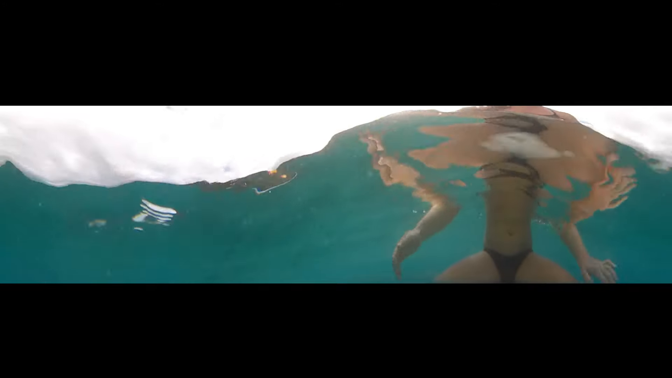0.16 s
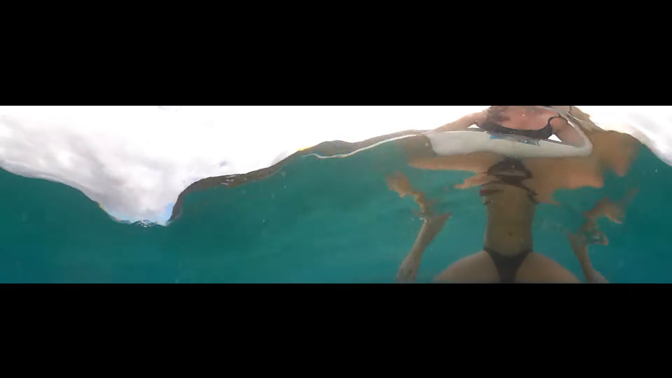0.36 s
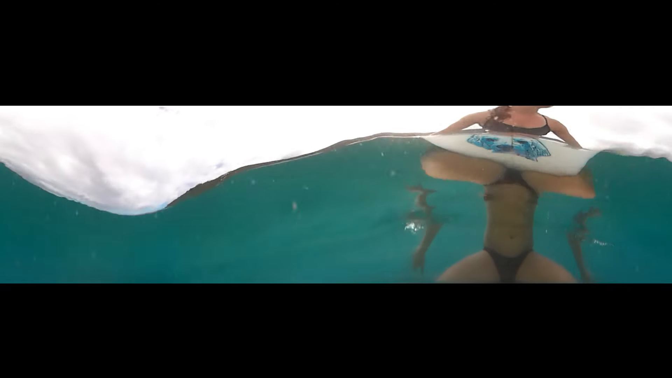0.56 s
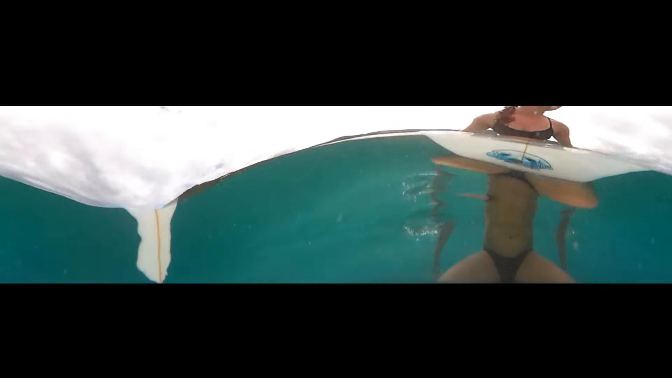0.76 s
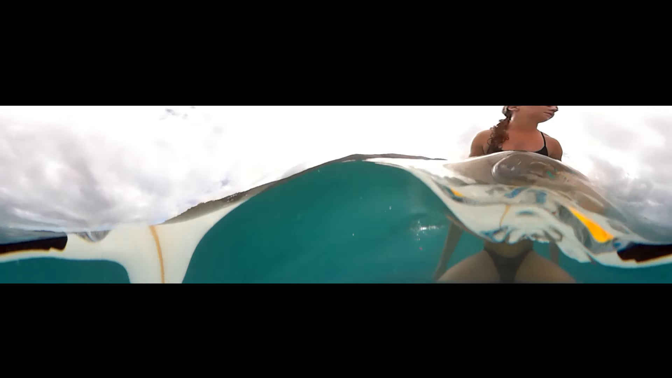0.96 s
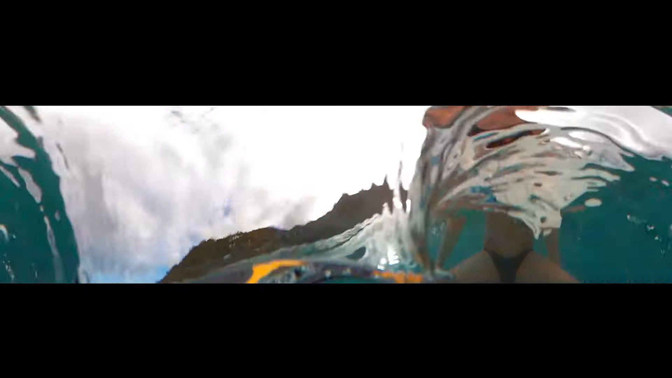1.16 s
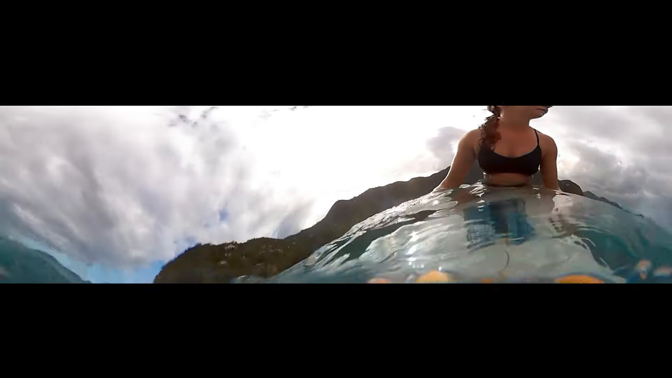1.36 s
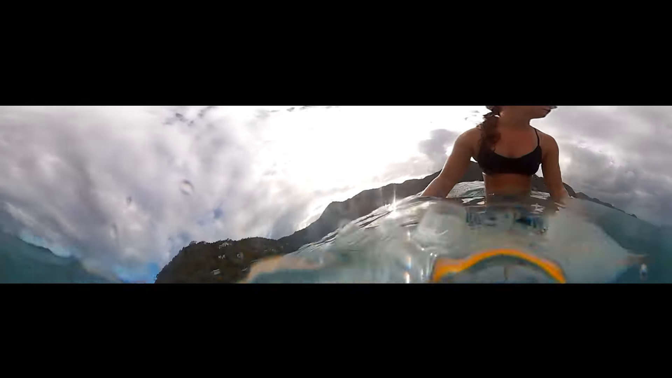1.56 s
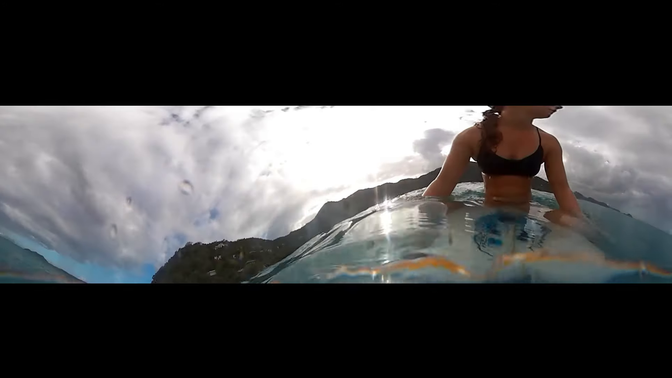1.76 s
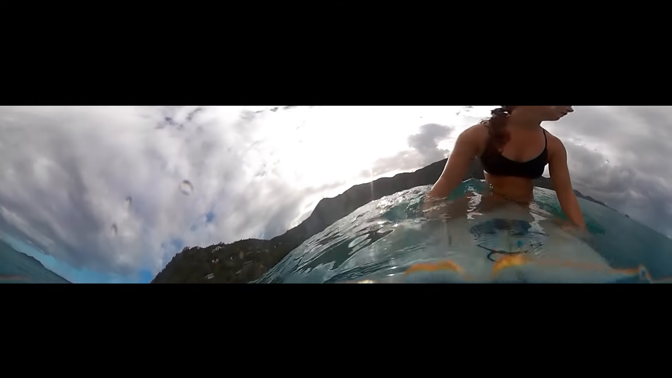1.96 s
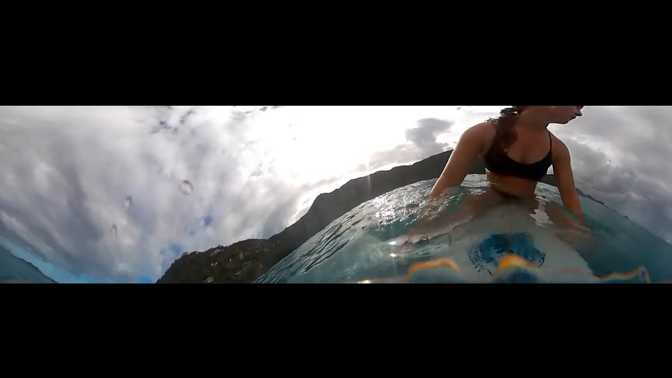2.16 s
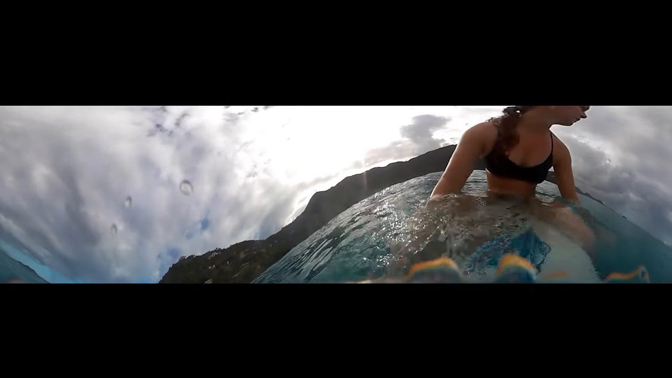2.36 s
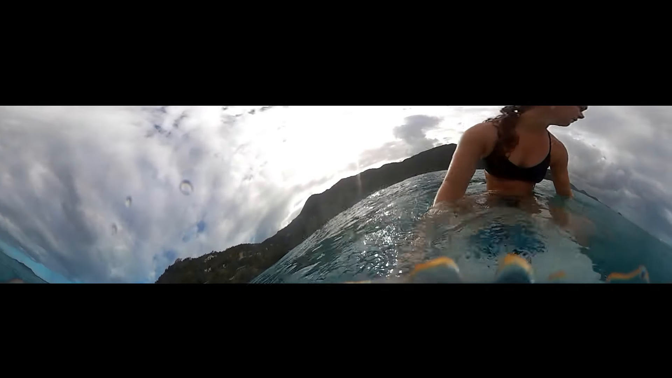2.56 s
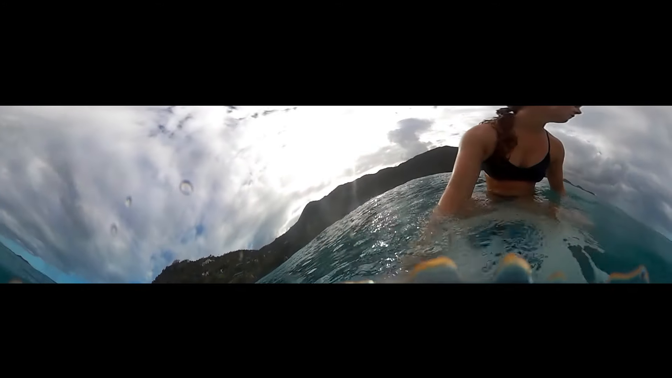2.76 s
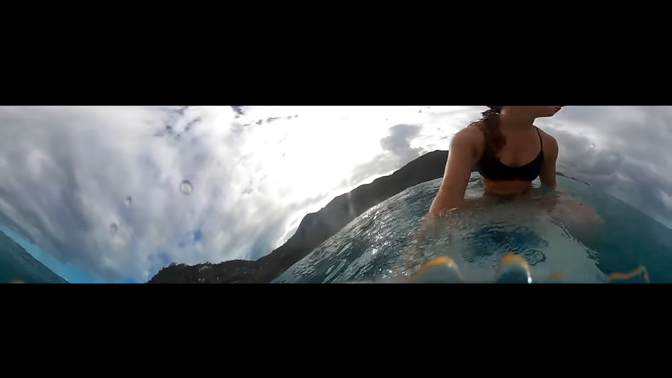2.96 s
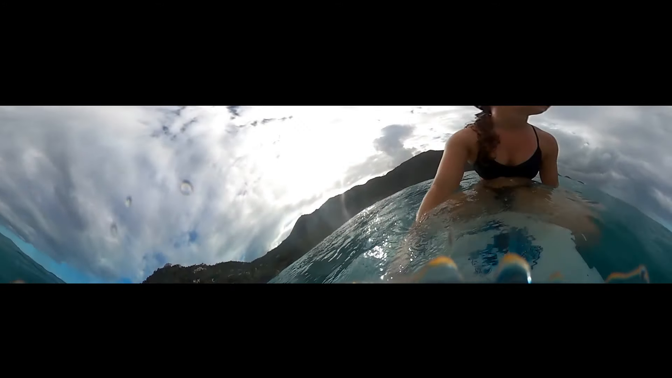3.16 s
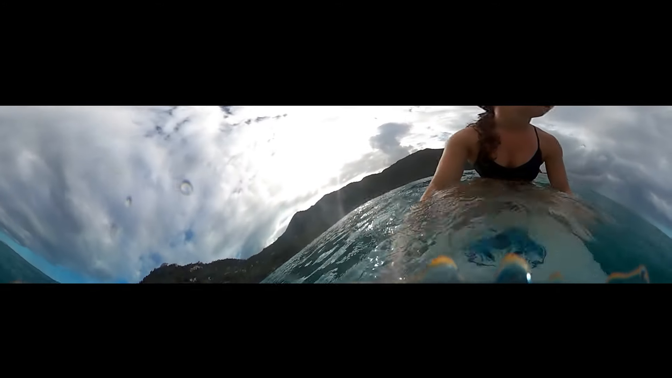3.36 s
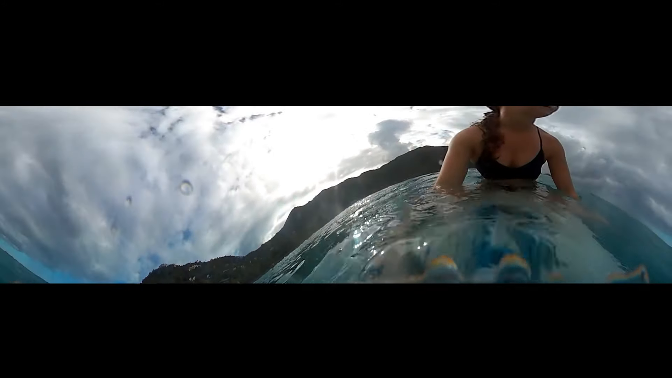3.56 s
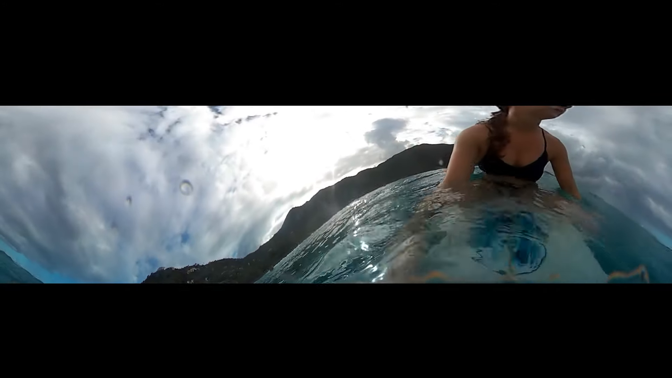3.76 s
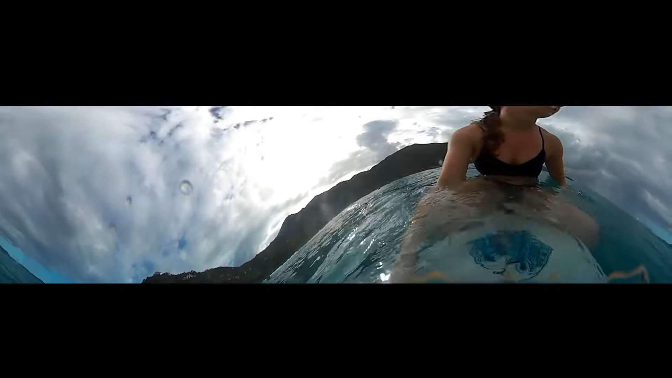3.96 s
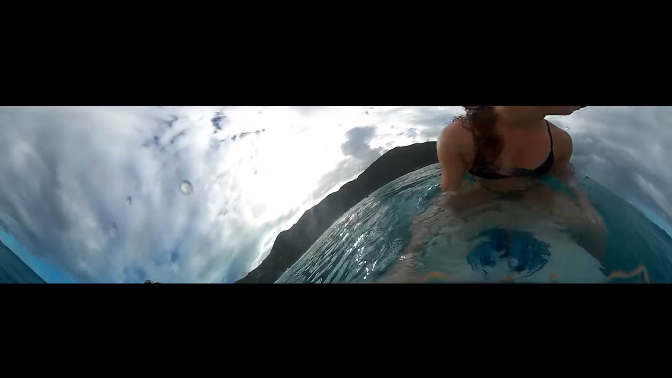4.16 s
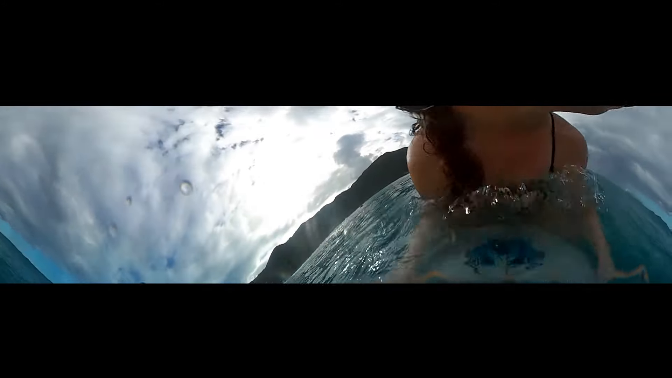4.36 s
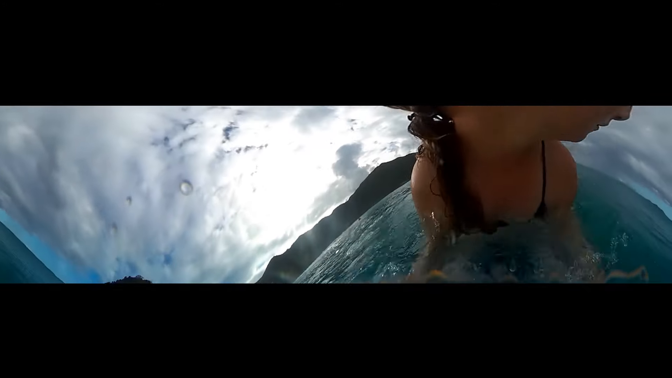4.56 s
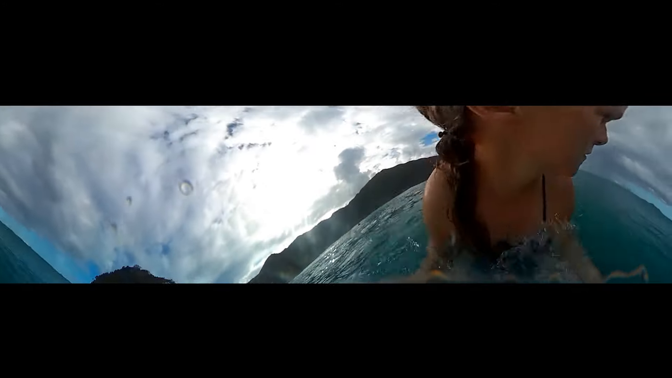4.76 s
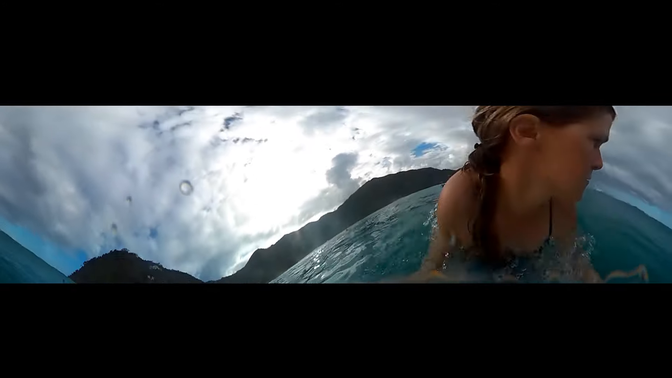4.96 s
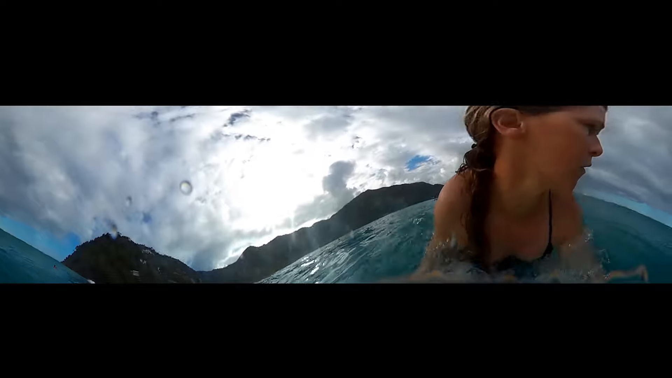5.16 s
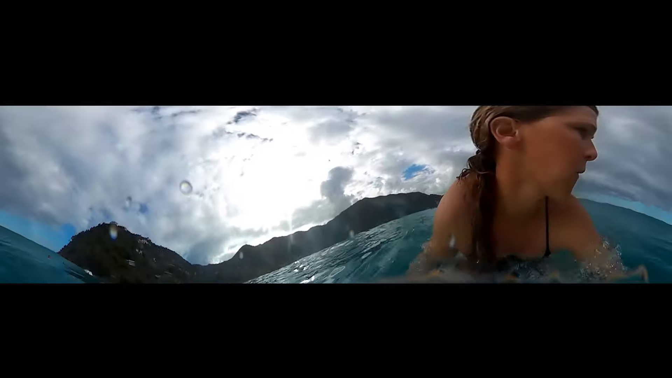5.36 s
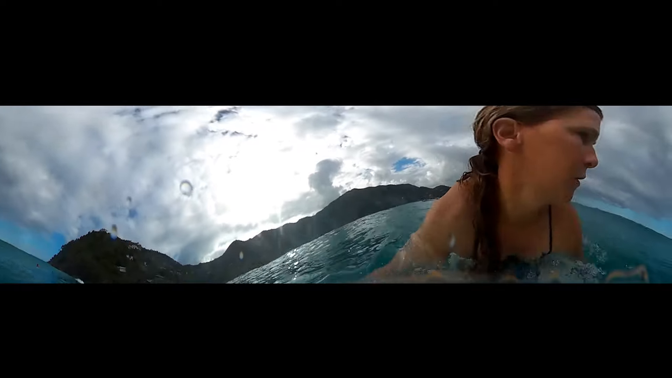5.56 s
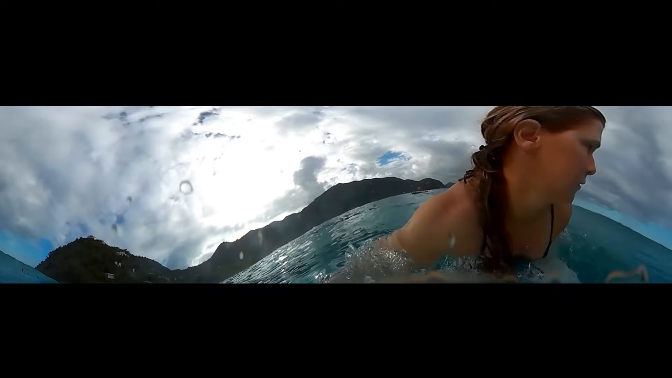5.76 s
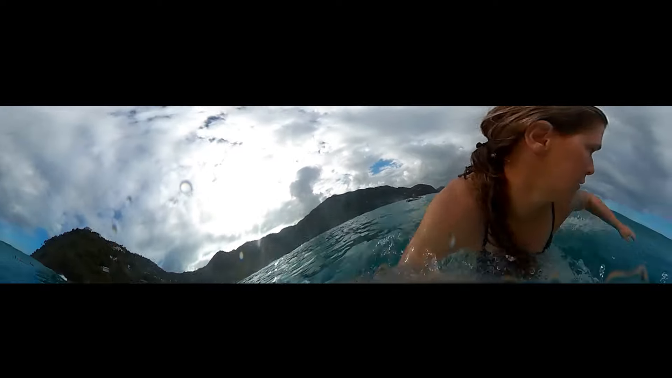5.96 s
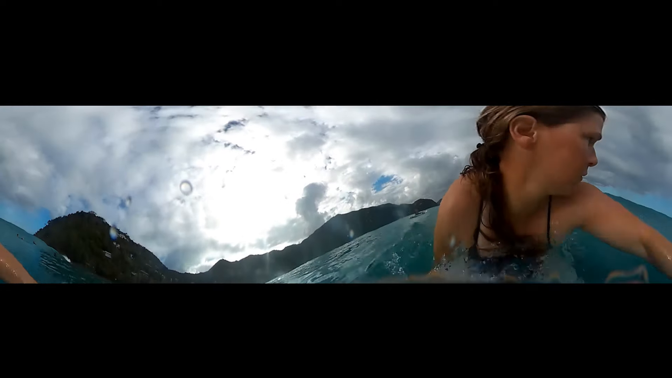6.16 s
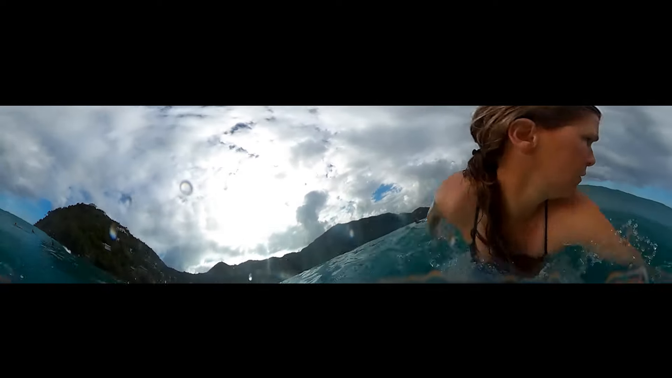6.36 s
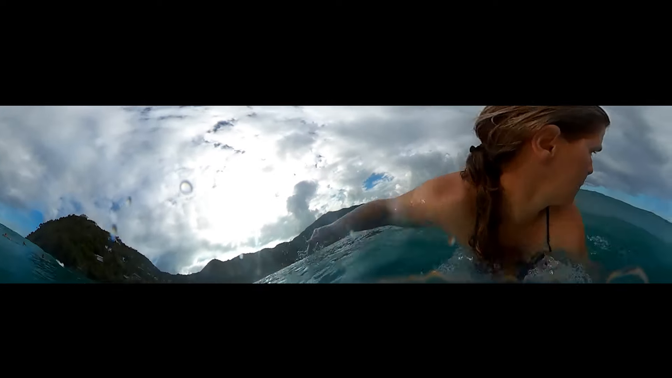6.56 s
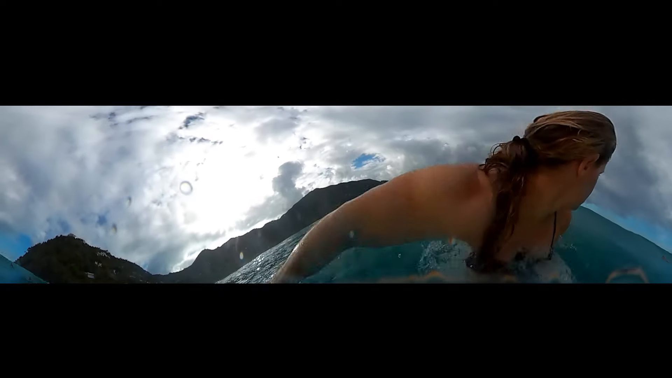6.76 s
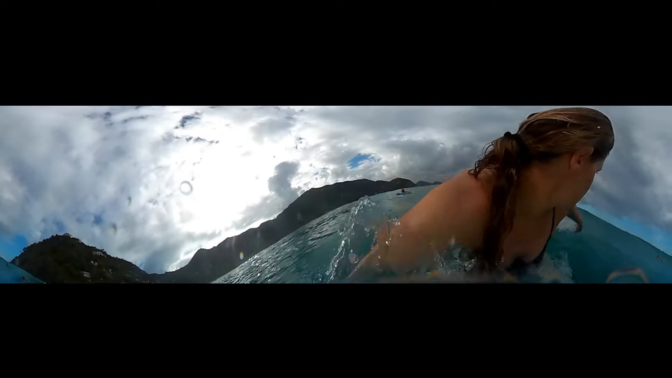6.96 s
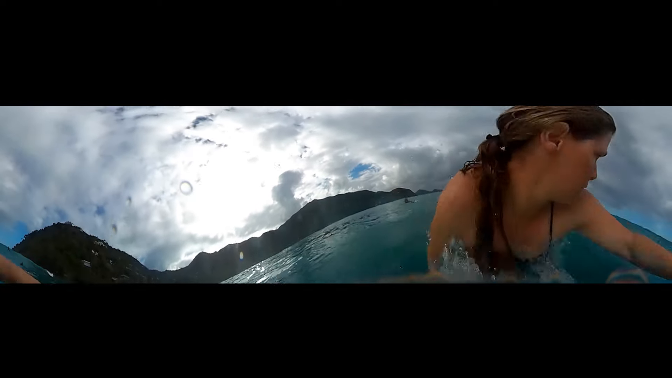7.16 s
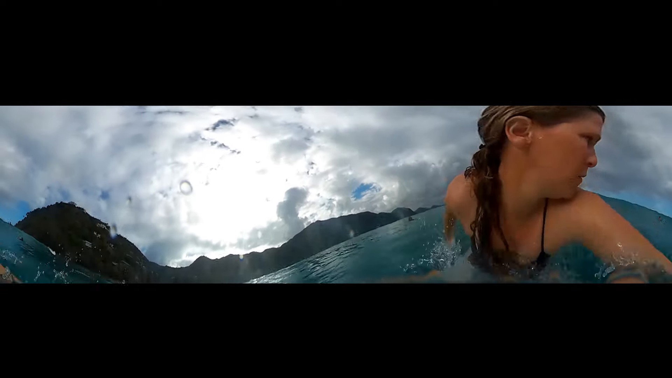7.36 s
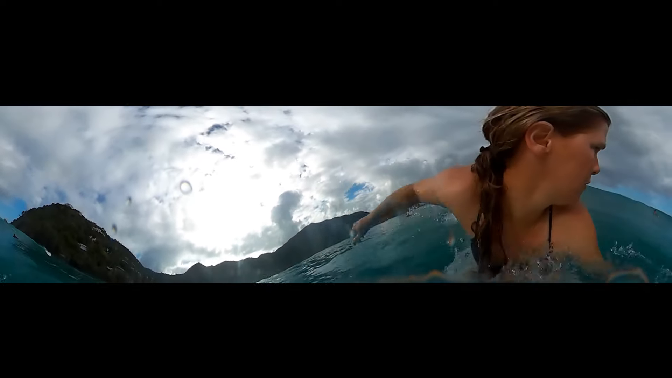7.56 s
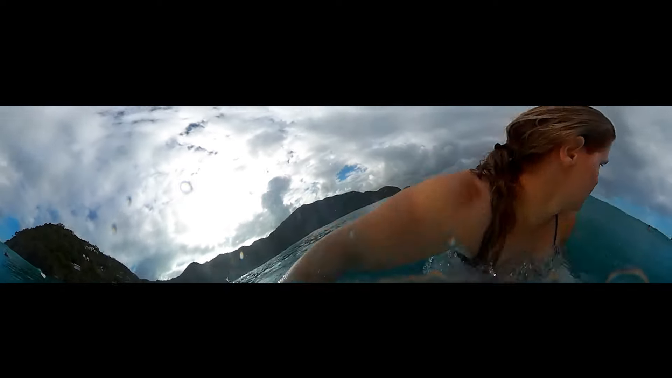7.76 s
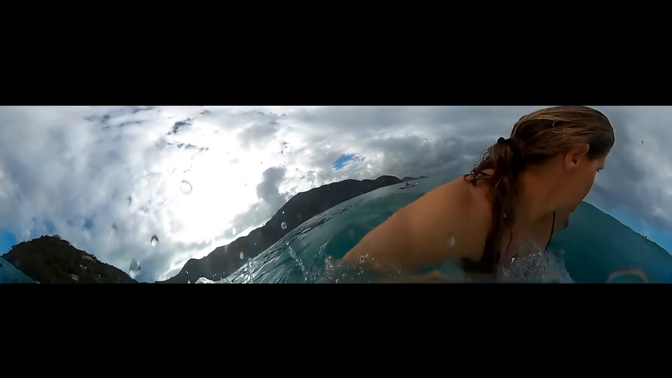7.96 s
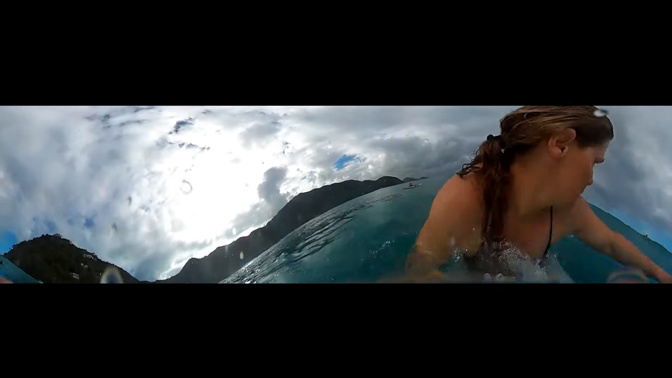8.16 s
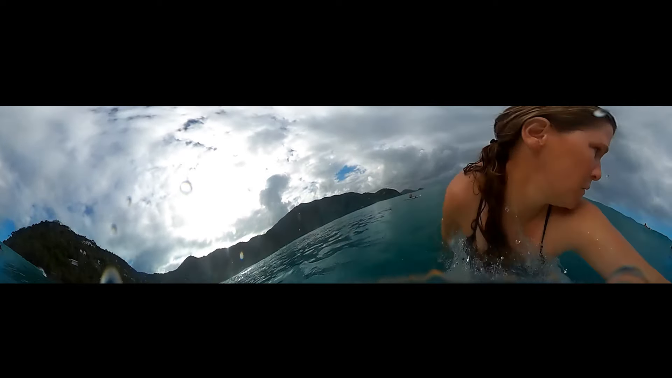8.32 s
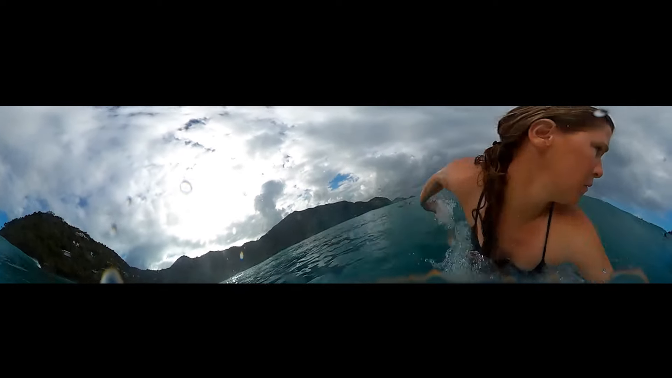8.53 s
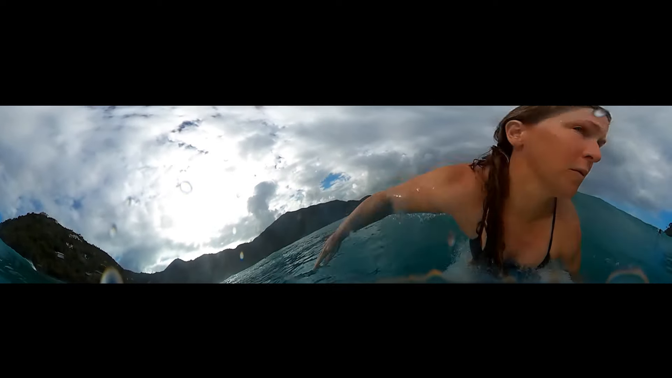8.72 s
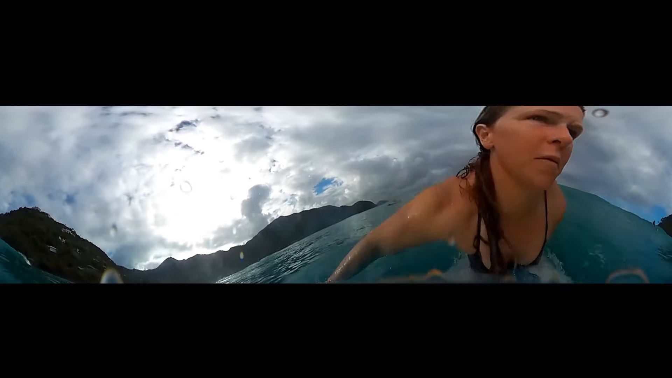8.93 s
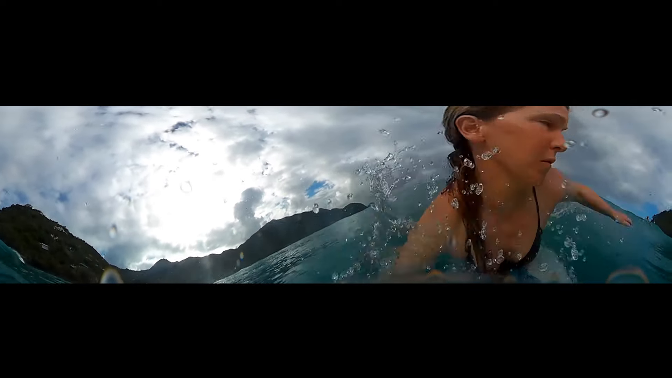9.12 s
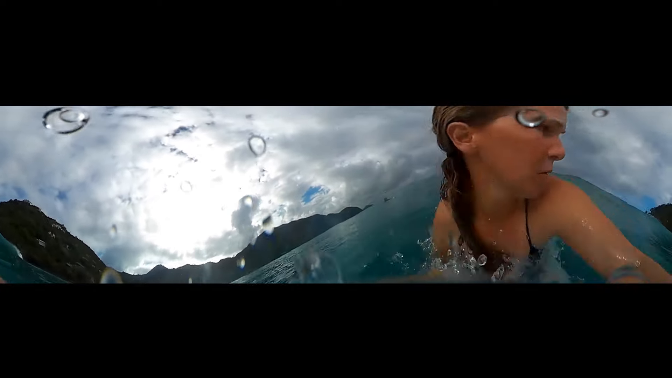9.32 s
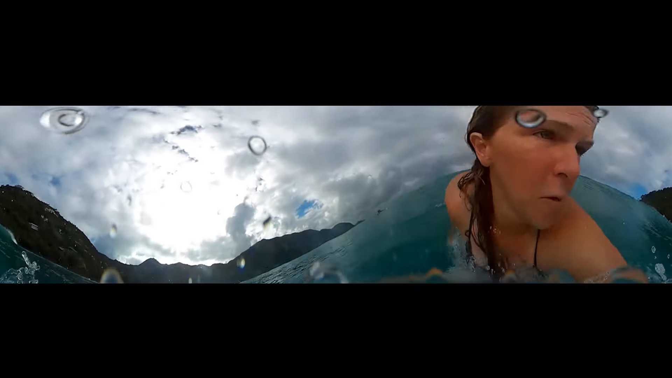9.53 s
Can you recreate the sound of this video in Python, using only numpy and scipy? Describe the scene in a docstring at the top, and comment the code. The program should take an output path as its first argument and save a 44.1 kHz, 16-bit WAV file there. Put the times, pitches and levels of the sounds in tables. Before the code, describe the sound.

Sea water heard through a waterproof housing: faint hiss and plops, one violent slap, bubbly draining, then thick rushing, knocking paddle splashes.

```python
"""A camera in a waterproof housing on the nose of a surfboard, over the steady noise of its microphones.
Calm water laps, a wave slaps the board and drains, then paddling arms churn the sea.
The water is damped sine bubbles over filtered noise in four bands; drops splat on the housing as noise
bursts and air pockets ring as rising sines. The loud peaks overload; near the end the sound drops out briefly.
"""
import sys
import numpy as np
from scipy import signal
from scipy.fft import rfft, irfft, next_fast_len
from scipy.io import wavfile
from scipy.ndimage import uniform_filter1d, map_coordinates

SR = 44100
rng = np.random.default_rng(int(sys.argv[2]) if len(sys.argv) > 2 else 0)


def wrap_up_sound(samples):
    """Save the sound to the file named by the first command line argument, as 16-bit audio."""
    columns = np.atleast_2d(samples).T
    # keep every value between -1 and 1, then stretch to whole-number steps
    tamed = np.clip(columns, -1, 1)
    steps = np.round(tamed * 32767).astype(np.int16)
    wavfile.write(sys.argv[1], SR, steps)


N = 427329


def amp(db):
    """Amplitude factor of a level in dB."""
    return 10 ** (np.asarray(db) / 20)


def unit(x):
    """x scaled to an RMS of 1."""
    return x / np.sqrt(np.mean(x ** 2) + 1e-20)


def along(points, hz):
    """(Hz, value) points interpolated on a log frequency axis."""
    f, v = np.transpose(points)
    return np.interp(np.log(hz + 1), np.log(f + 1), v)


def curves(rows):
    """One value per sample for each column after the time."""
    s, *columns = np.transpose(rows)
    return [np.interp(np.arange(N) / SR, s, column) for column in columns]


def wobble(knots_per_s):
    """A smooth random curve through normally distributed knots."""
    knots = rng.standard_normal(int(N * knots_per_s / SR) + 4)
    return map_coordinates(knots, [np.arange(N) * knots_per_s / SR])


def coloured(x, spectrum):
    """x through a causal minimum-phase filter, made by folding the cepstrum of the spectrum."""
    m = 2 * next_fast_len(x.shape[-1] // 2 + 4096)
    hz = np.fft.rfftfreq(m, 1 / SR)
    fold = irfft(np.log(amp(along(spectrum, hz))), m)
    fold[1:m // 2] *= 2
    fold[m // 2 + 1:] = 0
    return irfft(rfft(x, m) * np.exp(rfft(fold)), m)[..., :x.shape[-1]]


# microphone noise spectrum: (frequency [Hz], relative density [dB])
HISS_SPECTRUM = [(60, -23.5), (150, 2), (400, -6), (1500, -21.5), (4400, -27.5), (5250, -41.5), (6200, -32),
                 (9000, -29.5), (11600, -30.5), (12800, -88), (16000, -120)]


def hiss():
    """The steady noise of the microphones: filtered noise, unrelated left and right."""
    return amp(-58.5) * unit(coloured(rng.standard_normal((2, N)), HISS_SPECTRUM))


# likeness of the ports: (frequency [Hz], left-right correlation [-1 to 1])
PORT_LIKENESS = [(60, 1), (120, 1), (240, 0.83), (490, 0.3), (990, 1), (2000, 0.3), (4040, 0.34),
                 (5600, 0.48), (6400, -.6), (8140, -0.32)]
# balance of the ports: (frequency [Hz], left over right [dB])
PORT_BALANCE = [(60, 5), (100, 10.5), (180, 7.5), (310, 0.5), (530, 4), (920, -1.5), (1580, 1), (2730, 9),
                (4720, 7), (8140, 2.5)]


def ports(pair):
    """Two unrelated sounds mixed as the left and right port hear them, by frequency."""
    hz = np.fft.rfftfreq(N, 1 / SR)
    turn = np.arccos(np.clip(along(PORT_LIKENESS, hz), -1, 1)) / 2
    common, opposed = rfft(pair) * [np.cos(turn), np.sin(turn)]
    balance = amp(np.outer([.5, -.5], along(PORT_BALANCE, hz)))
    return irfft(np.array([common + opposed, common - opposed]) * balance, N)


# narrow housing modes that ring under the water's load: (centre [Hz], width [Hz], level [dB])
SHELL_MODES = [(270.3, 19, -3), (724, 38, -6.5), (1040, 100, -9), (2015, 220, 3), (3254, 150, 2),
               (7300, 300, -1.5), (8850, 400, 3.5)]


def shell(x):
    """x plus the resonant ringing that it starts in the housing's modes."""
    f = np.fft.rfftfreq(N, 1 / SR)
    response = 1
    for centre, width, db in SHELL_MODES:
        response = response + amp(db) * 1j * f * width / (centre ** 2 - f * f + 1j * f * width)
    return irfft(rfft(x) * response, N)


def bubbles(count, pitch_hz, octaves, cycles, spread_db, size):
    """Random bubbles: quickly damped rising sines with a soft start, a few far louder than the rest."""
    when, tone, loud, life = rng.random((4, count))
    hz = pitch_hz * 2 ** (octaves * (2 * tone - 1))[:, None]
    turns = np.arange(size) / SR * hz
    tone_wave = np.sin(2 * np.pi * turns * (1 + 0.053 * turns / cycles))
    decay = amp(-30 * turns / (cycles * (0.83 + life[:, None])))
    ring = tone_wave * decay * (1 - np.exp(-turns)) ** 2
    ring *= amp(-spread_db * np.log(1 - .98 * loud))[:, None]
    at = (when * N).astype(int)[:, None] + np.arange(size)
    return unit(np.bincount(at.ravel(), ring.ravel(), N + size)[:N])


def froth(spectrum, share, lumps_db, **grain):
    """Bubbles (share of the power) over noise, in lumps, through the ports and housing."""
    pair = []
    for _ in range(2):
        ringing = np.sqrt(share) * bubbles(**grain)
        pair.append(ringing + np.sqrt(1 - share) * rng.standard_normal(N))
    heard = ports(coloured(np.array(pair), spectrum))
    return unit(shell(heard * amp(lumps_db)))


# low band the housing lets through: (frequency [Hz], relative density [dB])
CHURN_SPECTRUM = [(60, -47.5), (100, -19), (170, -5), (253, -11), (350, -12), (716, 0.5), (885, -2),
                  (1070, -0.5), (1500, -4.5), (1900, -23), (2400, -27.5), (4000, -120)]


def churn(slosh, patter_db):
    """Large, low-pitched bubbles over noise."""
    lumps_db = .3 * patter_db + 1.5 * slosh + 1.6 * wobble(7)
    return froth(CHURN_SPECTRUM, share=.6, lumps_db=lumps_db, count=8000, pitch_hz=617.7,
                 octaves=1.6, cycles=14, spread_db=2.3, size=1100)


# middle band the housing lets through: (frequency [Hz], relative density [dB])
SPRAY_SPECTRUM = [(700, -120), (1500, -6), (1970, -4), (2250, -9), (2510, -3), (2800, -9), (3300, -4),
                  (4400, -11.5), (5000, -31), (7000, -120)]


def spray(slosh, patter_db):
    """Smaller, higher bubbles over noise, following the droplets in full."""
    lumps_db = patter_db + 1.5 * slosh + 2.6 * wobble(11)
    return froth(SPRAY_SPECTRUM, share=.5, lumps_db=lumps_db, count=6000, pitch_hz=2911,
                 octaves=.75, cycles=20, spread_db=3.3, size=500)


# treble the housing lets through: (frequency [Hz], relative density [dB])
FIZZ_SPECTRUM = [(3000, -120), (4600, -64), (5300, -16.5), (6300, -5.5), (7200, -4), (8000, -10),
                 (8700, -13), (9500, -18), (12000, -35.5), (16000, -120)]


def fizz(slosh, patter_db):
    """The finest, highest bubbles over noise, lumped most by the slosh among the froths."""
    lumps_db = patter_db + 3.0 * slosh + 2.5 * wobble(6.3)
    return froth(FIZZ_SPECTRUM, share=.5, lumps_db=lumps_db, count=5000, pitch_hz=6550,
                 octaves=.75, cycles=20, spread_db=3.3, size=240)


# bass of the moving water: (frequency [Hz], relative density [dB])
SURGE_SPECTRUM = [(5, -62), (25, -8), (50, 5.5), (85, 0), (130, 4.5), (200, -31), (500, -120)]


def surge(slosh):
    """Low noise of water pushing on the ports, far more on the left."""
    left, stray = rng.standard_normal((2, N))
    push = np.array([1.4 * left, .2 * left + .35 * stray])
    return unit(coloured(push, SURGE_SPECTRUM) * amp(3.9 * slosh + 2.7 * wobble(4.6)))


DRIPS_PER_S, DRIP_PEAK_MS = 45, 2


def drips():
    """Power of scattered droplets on the housing: short bumps, a few strong."""
    when, size = rng.random((2, round(DRIPS_PER_S * N / SR)))
    ms = np.arange(SR // 25) / SR * 1000
    hits = np.bincount((when * N).astype(int), 1 / (1.02 - size) ** 1.02, N)
    bump = .5 * ms / DRIP_PEAK_MS * np.exp(1 - ms / DRIP_PEAK_MS)
    return np.abs(signal.fftconvolve(hits, bump)[:N])  # abs: no negative rounding residue


RISE_SHARE = 0.87  # rise time over fall time


def swells(under_db, peaks, drop_db):
    """A level raised by (s, dB, length s) peaks, each losing drop_db per length; powers add."""
    t, power = np.arange(N) / SR, amp(under_db) ** 2
    for s, db, length in peaks:
        away = np.maximum((s - t) / RISE_SHARE, t - s) / length
        near = away < 5
        power[near] += amp(db - drop_db * away[near]) ** 2
    return np.sqrt(power)


# water between splashes, calm, then draining, then paddled:
# (time [s], churn level [dB], spray level [dB], fizz level [dB], surge level [dB])
WASH_LEVELS = [(0.0, -64.5, -71.5, -58, -65.5), (1.1, -51, -73, -67, -60.5), (1.4, -55.5, -70, -72, -64),
               (2.29, -54.5, -59, -87, -66), (2.43, -51, -66.5, -85, -60), (2.6, -40, -46.5, -78.5, -42),
               (3.2, -56.5, -58.5, -86, -61), (3.5, -47.5, -49.5, -67.5, -49.5),
               (4.0, -41, -63.5, -89, -52.5), (4.6, -36, -68, -85, -39), (5.1, -18.5, -36.5, -63, -38),
               (5.55, -35, -43.5, -85.5, -48), (6.1, -24, -33, -56, -40), (6.4, -23.5, -34, -54, -45),
               (7.0, -18, -33, -73, -38), (7.5, -20.5, -40.5, -80, -43.5), (8.25, -18, -36.5, -60, -37.5),
               (9.0, -21.5, -42.5, -61.5, -35.5), (9.69, -20.5, -35.5, -73, -34)]
# splashes of the wave and the arms:
# (peak time [s], churn level [dB], spray level [dB], fizz level [dB], length [s])
SPLASH_PEAKS = [(1.202, -47, -57, -81, 0.037), (2.491, -14.5, -30.5, -47, 0.02),
                (2.507, -15.5, -17.5, -31, 0.026), (2.531, -23.5, -24.5, -40.5, 0.037),
                (2.605, -21.5, -41, -61, 0.026), (2.701, -32, -42, -70, 0.046),
                (2.803, -26.5, -44, -78, 0.058), (3.339, -31, -37, -69, 0.028),
                (3.487, -32, -47, -72, 0.056), (3.617, -39, -58, -62, 0.063), (3.733, -29, -58, -77, 0.038),
                (3.833, -30, -70, -85, 0.041), (4.14, -40, -43.5, -78, 0.14), (4.243, -33, -46, -85, 0.043),
                (4.415, -26, -38, -61.5, 0.2), (4.536, -20.5, -38.5, -64, 0.051),
                (4.753, -26.5, -61, -56, 0.081), (4.97, -22, -34.5, -50, 0.29),
                (5.226, -9.5, -21, -48, 0.056), (5.458, -16.5, -36.5, -51.5, 0.1),
                (5.707, -18, -44, -52, 0.11), (5.848, -13.5, -26.5, -46, 0.18),
                (6.01, -15, -26.5, -48.5, 0.076), (6.143, -15, -39, -62, 0.071),
                (6.304, -43, -32.5, -45.5, 0.079), (6.517, -12, -31.5, -46, 0.063),
                (6.658, -20, -28, -44, 0.044), (6.723, -13.5, -24, -40, 0.021),
                (6.901, -14, -35, -45.5, 0.12), (7.167, -17, -38.5, -45.5, 0.24),
                (7.242, -10, -19.5, -35.5, 0.043), (7.408, -8.5, -25, -34.5, 0.036),
                (7.598, -20.5, -24.5, -46, 0.15), (7.778, -10, -22.5, -46, 0.046),
                (7.934, -15.5, -24.5, -35.5, 0.12), (8.025, -28.5, -29, -68, 0.076),
                (8.402, -13, -26, -49.5, 0.1), (8.752, -14, -30, -76, 0.31),
                (9.155, -20, -30.5, -39.5, 0.15), (9.233, -10.5, -28.5, -45, 0.068),
                (9.407, -8.5, -14, -34.5, 0.07), (9.463, -9.5, -24, -51, 0.078),
                (9.622, -11, -25, -43.5, 0.054)]
SPLASH_DROPS_DB = [11, 16.5, 17]  # loss of churn, spray, fizz over one length
# low shoves of the swell against the ports: (peak time [s], level [dB])
SWELL_SHOVES = [(2.46, -44.5), (2.75, -40.5), (2.95, -46), (4.41, -25.5), (5.31, -25.5), (6.64, -31),
                (7.219, -22), (7.7, -31), (9.21, -32), (9.42, -25), (9.65, -20)]
SHOVE_S, SHOVE_DROP_DB = 0.12, 15.5  # length; loss over one length


def sea():
    """Four bands of moving water, each at its own level, sloshing in partly shared lumps."""
    *bands_db, surge_db = curves(WASH_LEVELS)
    s, *peaks_db, length = np.transpose(SPLASH_PEAKS)
    gains = []
    for under_db, peak_db, drop_db in zip(bands_db, peaks_db, SPLASH_DROPS_DB):
        gains.append(swells(under_db, zip(s, peak_db, length), drop_db))
    shoves = [(at, db, SHOVE_S) for at, db in SWELL_SHOVES]
    gains.append(swells(surge_db, shoves, SHOVE_DROP_DB))
    slosh = .6 * wobble(22) + .8 * wobble(55)
    patter_db = 10 * np.log10(1 + amp(-3) * drips())
    layers = (churn(slosh, patter_db), spray(slosh, patter_db), fizz(slosh, patter_db), surge(slosh))
    return sum(gain * layer for gain, layer in zip(gains, layers))


def add_at(out, s, burst):
    """Add a stereo burst to out, starting 30 samples ahead of time s."""
    out[:, round(s * SR) - 30:][:, :burst.shape[-1]] += burst


# drops and sheets of water on the housing:
# (time [s], relative level [dB], treble drive over it [dB])
SPLAT_HITS = [(0.137, -35, -14), (0.211, -42.5, -2), (0.466, -60.5, 12), (0.643, -53, 8), (0.712, -55, 16),
              (1.178, -29.5, -15), (1.193, -25, -43), (1.775, -34, -18), (2.471, -9, -22),
              (2.479, -11, -20), (2.4877, -2, -19), (2.4935, 8, -10), (2.512, -3.5, -12),
              (2.5324, -5, -16.5), (2.54, -9.5, -23), (2.5863, -13.5, -31), (2.605, -20.5, -30),
              (3.315, -21, -13.5), (3.332, -11.5, -28), (3.3915, -28.5, -32), (3.4235, -20.5, -10.5),
              (3.462, -21, -3.5), (3.4667, 2.5, -23.5), (3.607, -34, -5), (3.836, -28, -6.5),
              (3.914, -32, -36), (4.077, -28.5, -31), (4.151, -27, -36), (4.7077, -8.5, -38),
              (4.818, -21.5, -46), (4.959, -33.5, -3), (5.203, -5, -29), (5.218, -16.5, -24),
              (5.466, -23.5, -14), (5.7704, -13.5, -27), (5.796, -9, -31), (5.832, -15, -22.5),
              (6.0318, -15, -23), (6.2523, -22, -21), (6.361, -6.5, -49), (6.622, -10.5, -21.5),
              (6.631, -11, -26), (6.856, -10, -35), (6.917, -11.5, -31), (6.957, -18.5, -45),
              (7.013, -18.5, -29), (7.039, -6.5, -25), (7.198, -19, -22), (7.225, -15, -29),
              (7.419, -11.5, -15.5), (7.5717, -14, -30), (7.762, -14, -39), (7.91, -18, -19.5),
              (7.9996, -13.5, -24), (8.7396, -7, -29), (8.7753, -21, -49), (8.8053, -1.5, -19.5),
              (9.1264, -15, -17.5), (9.371, -18.5, -32), (9.386, -13, -32), (9.41, -7.5, -22),
              (9.424, -13, -22)]
SPLAT_T60_S, SPLAT_RISE_S = 0.032, 0.0014


def splats():
    """Short ragged noise bursts shake the housing's upper resonances, more at the left port."""
    low, high, t = np.zeros((2, N + SR)), np.zeros((2, N + SR)), np.arange(SR // 8) / SR
    for s, db, treble_db in SPLAT_HITS:
        noise = rng.standard_normal((3, len(t)))
        ragged_db = 3.4 * np.repeat(rng.standard_normal(len(t) // 64 + 1), 64)[:len(t)]
        rise = 1 - np.exp(-(t / SPLAT_RISE_S) ** 2)
        a, b, c = noise * amp(-60 * t / SPLAT_T60_S + ragged_db) * rise
        add_at(low, s, amp(db) * np.array([a + .5 * b, a - .5 * b]))
        add_at(high, s, amp(db + treble_db) * np.array([0.65 * c + b, c - b]))
    body = amp([[13], [7]]) * coloured(low, SPRAY_SPECTRUM)
    treble = amp([[18], [15]]) * coloured(high, FIZZ_SPECTRUM)
    return (body + treble)[:, :N]


# air pockets ringing by the ports:
# (time [s], nominal pitch [Hz], level [dB], length [ms], left over right [dB])
AIR_POCKETS = [(0.428, 1240, -46, 5.4, 0), (0.654, 1420, -47, 19, 0), (0.796, 503, -43, 47, 0),
               (0.9242, 1000, -39.5, 22, 4), (1.1789, 980, -32, 3, 4), (1.1943, 1130, -23.5, 2.4, 1),
               (1.198, 2910, -34, 8, 2), (1.2697, 1557, -11, 8.7, -2), (1.389, 935, -45, 13, 0),
               (1.497, 1360, -44.5, 12, 4), (1.945, 1390, -40, 7.3, 1), (2.2348, 1290, -37.5, 4.9, 2),
               (2.4224, 191, -30.5, 21, 7), (2.4743, 751, -9.5, 5.3, 3.5), (2.4947, 1052, 1, 7, 1),
               (2.505, 1900, -5.5, 7.2, -5), (2.5224, 1314, 3, 3.3, 1), (2.532, 1393, 2, 7.6, 1.5),
               (2.542, 1484, -8.5, 8, -1.5), (2.5679, 1048, -15.5, 14, -11), (2.588, 3680, -9.5, 1.8, 5),
               (2.592, 955, 0, 10, -7.5), (2.6746, 1980, -12, 5, 1), (2.679, 571, -15.5, 25, -2),
               (2.6998, 894, -9.5, 6.4, -2), (2.694, 3350, -33, 5, 5), (2.713, 2440, -32, 10, 5),
               (2.722, 1040, -33.5, 25, 0), (2.737, 258, -23, 10.5, 3.5), (2.741, 2150, -33, 10, 0),
               (2.776, 795, -14, 23, -1), (2.7817, 910, -9, 2.4, 5), (2.789, 1145, 0, 6, 0),
               (2.795, 2540, -17.5, 4.4, 11.5), (2.8265, 945, -22.5, 13, -4),
               (2.8304, 218, -20.5, 8.3, 9.5), (2.8525, 1115, -20, 7.8, -0.5), (2.886, 1610, -41, 14, 6),
               (2.907, 990, -33.5, 12, -1), (2.941, 1900, -38.5, 5.3, 7), (3.034, 966, -16.5, 5.5, 2),
               (3.0408, 1044, -13.5, 10, 1), (3.3158, 732, 3.5, 7.5, 6), (3.333, 1965, -6.5, 8.6, -5),
               (3.3904, 1340, -12, 9.2, 6.5), (3.4667, 1037, 5, 2.7, 11.5), (3.4681, 1654, 2.5, 1.7, 12),
               (3.521, 1420, -22.5, 4.9, 5.5), (3.57, 1080, -20.5, 7.7, -5), (3.581, 1347, -23.5, 44, -2),
               (3.589, 3340, -40, 5, 9), (3.6007, 904, -15, 10, -1.5), (3.609, 2760, -34.5, 9.5, 6),
               (3.637, 1045, -22, 16, -2), (3.651, 1914, -14, 11, -2), (3.664, 1330, -15.5, 9, 1.5),
               (3.677, 1780, -23, 16, -1.5), (3.683, 940, -22, 15, 0), (3.703, 1970, -26.5, 11, 3.5),
               (3.7336, 420, -30, 39, 13.5), (3.735, 1510, -27, 19, 0), (3.74, 2830, -35.5, 9.6, 7),
               (3.754, 2010, -36, 12, -1), (3.851, 2030, -35.5, 5.6, -2), (3.857, 1340, -21.5, 7.2, -1),
               (3.8619, 804, -15, 36, -0.5), (3.886, 1444, -24, 30, 1), (4.019, 633, -24.5, 19, 1.5),
               (4.055, 730, -22, 6.9, -1), (4.0823, 846, -19, 20, -0.5), (4.196, 905, -19, 8.4, 0),
               (4.22, 244, -26, 22, 5), (4.286, 1100, 0.5, 3.5, -1.5), (4.288, 250, -10, 13, 4),
               (4.3253, 206, -20.5, 17, 7.5), (4.372, 1610, -8, 1.9, 7.5), (4.4009, 210, -13, 9.3, 19.5),
               (4.5212, 755, -8.5, 17, -3), (4.569, 766, -3.5, 4.5, 1), (4.709, 1080, 2, 2, 4),
               (4.7404, 684, -5, 16.7, 7), (4.82, 860, -8, 4.7, -1), (4.949, 604, -12, 12, 1),
               (4.96, 1197, 10, 4, 0), (4.991, 730, -11.5, 11, 4), (5.032, 742, -13.5, 13, 2),
               (5.05, 404, -11.5, 15, 4), (5.1264, 1003, -6, 13, 0), (5.165, 743, 0.5, 14, 0.5),
               (5.2046, 1129, 3, 4.4, -2), (5.271, 1180, -3, 3.7, 0), (5.2713, 259.5, -6, 21, 4.5),
               (5.3317, 222, -13.5, 22, 5), (5.464, 1011, 1, 12.7, 0), (5.7034, 750, -12, 19, -1),
               (5.76, 1370, -8.5, 8.4, 3.5), (5.767, 2480, -13.5, 7.5, 5), (5.815, 790, -3.5, 14, -0.5),
               (5.829, 3270, -14.5, 10.5, 9.5), (5.8499, 244, 0.5, 8.5, 3), (5.866, 1430, -3.5, 3.3, -7),
               (6.0308, 1712, 0.5, 2.7, 5), (6.042, 3220, -21, 6.1, 15), (6.092, 1170, -10, 3.2, 3),
               (6.36, 2450, -6, 2.2, 4.5), (6.368, 1210, -10.5, 6.6, 7), (6.4293, 2310, -12.5, 4.2, 5),
               (6.5057, 1590, -11, 4.6, 5), (6.6217, 1158, 1, 3.2, -0.5), (6.626, 1366, -2.5, 5, 0),
               (6.632, 3170, -5.5, 4.5, 10.5), (6.66, 743, -15.5, 25, 2), (6.692, 724, -13.5, 25, -3.5),
               (6.731, 513, -6, 10.7, 5.5), (6.8538, 256, -9, 12, 5), (6.892, 452, -8, 9.9, 11),
               (6.9189, 1039, 4, 6.9, -5.5), (6.9426, 675, -2, 10.4, 11), (6.958, 2570, -14.5, 6.3, -1),
               (7.034, 916, -4.5, 9, 0), (7.123, 235, 2, 8.9, 8.5), (7.131, 1000, -5, 5, -1),
               (7.1704, 1037, 3, 3.4, -1.5), (7.198, 3280, -21, 4.2, 7), (7.2075, 948, 0, 7, 9),
               (7.229, 1058, 2.5, 2.8, -2), (7.243, 1326, -1.5, 6.8, 7), (7.3288, 1345, -16.5, 6.6, 26),
               (7.383, 950, -5, 9, 0), (7.3988, 731, -3.5, 10, -4), (7.4198, 660, 0, 5, 12),
               (7.428, 800, -3, 8, 0), (7.4971, 1010, -4, 3.5, -3), (7.547, 800, -9, 9, 0),
               (7.559, 728, 1, 8, 10), (7.62, 970, -11.5, 3.7, -6), (7.678, 970, -5, 5, 2.5),
               (7.768, 810, -13, 18, 0), (7.797, 980, -11, 5.9, 1), (7.8995, 795, -4.5, 22, 0.5),
               (7.9234, 697, -5.5, 19, 5), (7.953, 1010, -8, 9, 0.5), (7.997, 980, 6.5, 5, 0),
               (8.1495, 524, -9, 4.5, 10), (8.3, 670, -0.5, 6.6, 4.5), (8.3371, 714, -5.5, 8, 1.5),
               (8.401, 670, -11, 16, 0.5), (8.4329, 766, -11.5, 22, 0), (8.465, 856, -9, 6.7, -2),
               (8.632, 1061, -9.5, 41, -1.5), (8.6619, 593, -2, 8.4, 2), (8.7217, 716, -9, 5.2, 0),
               (8.7412, 1000, 9, 4.5, -1.5), (8.778, 2590, -10, 2, 10), (8.8065, 1081, 10, 7, -2),
               (8.881, 2530, -14, 4.3, 8.5), (8.982, 461, -17, 26, 16), (9.047, 448, -13.5, 5.3, 25.5),
               (9.1048, 1010, -8, 8.8, -0.5), (9.236, 810, -5, 4.2, -2.5), (9.4, 900, -3, 5.4, 0),
               (9.408, 1123, -2, 4.5, -7.5), (9.421, 1270, -6.5, 6.5, 2), (9.464, 1072, -6, 5.1, -1),
               (9.486, 475, -3, 8.8, 0), (9.627, 423.5, -3.5, 5, 12), (9.635, 377, -1.5, 7, 7),
               (9.678, 260, -3, 5.7, 9)]
SWELL_MS, SWELL_SHARE = 0.4, 0.27  # swell time: fixed part plus share of the length; then the fade
COLLAPSE_DB = 3  # the fade steepens as the pocket bursts
PITCH_RISE = 0.036  # share of the nominal pitch gained per length
WET_DB, WET_FADE_DB_PER_MS = -10, 1  # ragged tail: froth scatters the ring
PHASE_SCATTER_RAD = 0.27  # opposite at the two ports


def pockets():
    """Pockets swell and ring out, pitch rising, roughened by moving water; each knocks the housing."""
    out, knocks = np.zeros((2, N + SR)), np.zeros((2, N + SR))
    ms = np.arange(SR // 8) / SR * 1000
    for s, hz, db, length_ms, pan_db in AIR_POCKETS:
        swell_ms = SWELL_MS + SWELL_SHARE * length_ms
        fade_ms = max(length_ms - swell_ms, .5)
        knots = rng.standard_normal((2, 80))
        places = [np.outer([0, 1], ms ** 0), np.outer([1, 1], ms * .35)]
        waver, flutter = map_coordinates(knots, places, order=1)
        turns = np.cumsum(.985 + 0.038 * waver + PITCH_RISE * ms / length_ms) * hz / SR
        after = np.maximum(ms - swell_ms, 0) / fade_ms
        swell_db = -6 * np.clip(1 - ms / swell_ms, 0, 1)
        shape = amp(swell_db - 5.4 * after - COLLAPSE_DB * after ** 2)
        onset = 1 - np.exp(-(turns / 0.72) ** 2)
        roughness = amp(2.0 * uniform_filter1d(flutter, size=40))
        phase = rng.normal() * PHASE_SCATTER_RAD * np.array([[1], [-1]])
        ring = shape * onset * roughness * np.sin(2 * np.pi * turns + phase)
        sides_db = np.array([[pan_db / 2], [-pan_db / 2]])
        add_at(out, s, amp(db + sides_db) * ring)
        thud = (1 - np.exp(-ms / 0.91)) * rng.standard_normal(len(ms))
        add_at(knocks, s, amp(db - 1.51 * ms + sides_db / 2) * thud)
    tail = amp(-WET_FADE_DB_PER_MS * ms) * rng.standard_normal((1, len(ms)))
    wet = amp(WET_DB) * signal.fftconvolve(out, tail / np.linalg.norm(tail[0]), axes=1)
    return (out + wet[:, :N + SR] + amp(4.5) * coloured(knocks, CHURN_SPECTRUM))[:, :N]


def scene():
    """Microphone noise, moving water, splats and air pockets together."""
    return hiss() + sea() + splats() + pockets()


# brief dropout: (start [s], end [s])
DROPOUT = (9.1885, 9.2085)
EDGE_S, FLOOR_GAIN = 0.006, .002  # fades around the dropout and at the end
DULL_HZ, TOP_HZ = 9300, 20500  # treble rolloff corner; band limit


def record(dry):
    """The input stage clips, the sound drops out once and ends softly, then the treble is limited."""
    clipped = dry / (1 + np.abs(dry) ** 12) ** (1 / 12)
    t = np.arange(N) / SR
    from_dropout_s = np.maximum(DROPOUT[0] - t, t - DROPOUT[1])
    from_edge_s = np.minimum(from_dropout_s, t[-1] - t)
    gated = clipped * np.clip(from_edge_s / EDGE_S, FLOOR_GAIN, 1)
    m = 2 * next_fast_len(N // 2 + SR // 10)
    hz = np.fft.rfftfreq(m, 1 / SR)
    response = (hz < TOP_HZ) / np.sqrt(1 + (hz / DULL_HZ) ** 4)
    return irfft(rfft(gated, m) * response, m)[:, :N]


dry = scene()
out = record(dry)
wrap_up_sound(out)
```